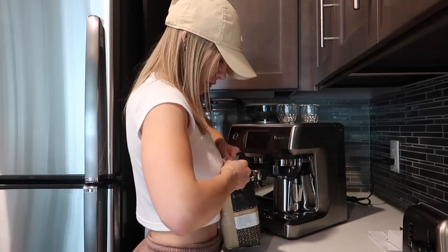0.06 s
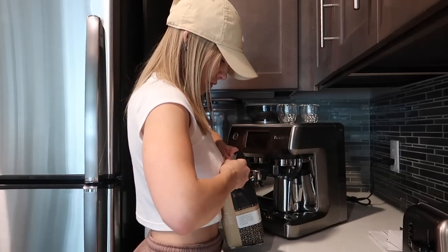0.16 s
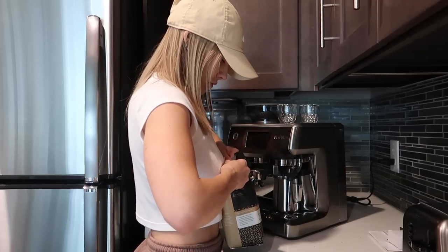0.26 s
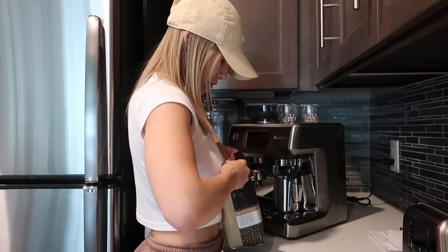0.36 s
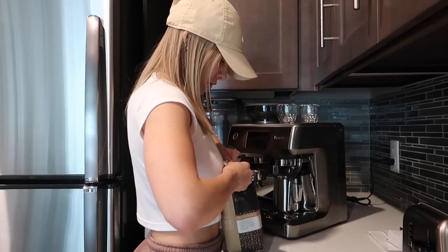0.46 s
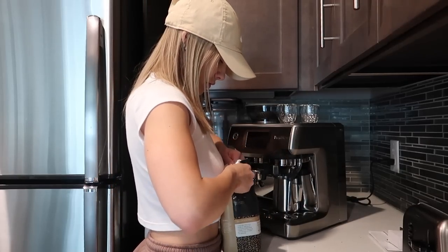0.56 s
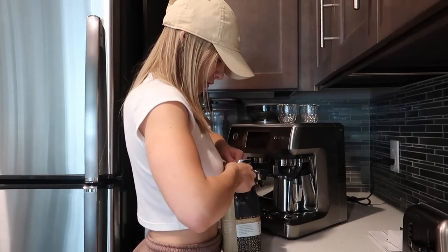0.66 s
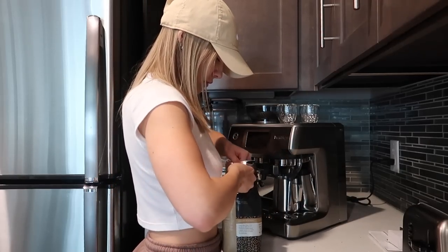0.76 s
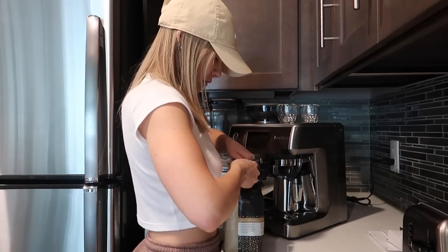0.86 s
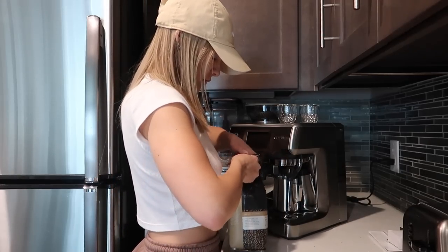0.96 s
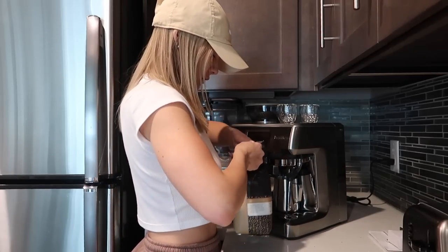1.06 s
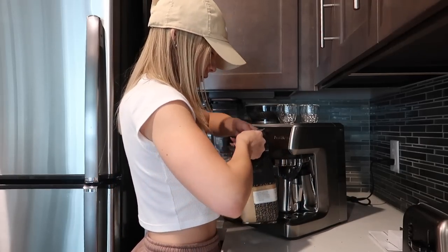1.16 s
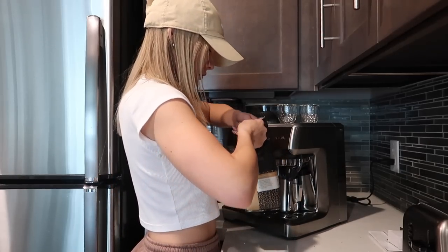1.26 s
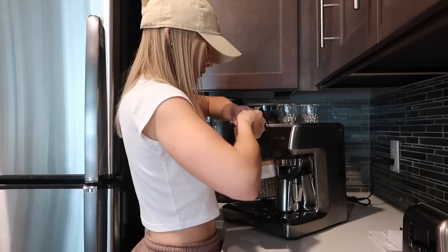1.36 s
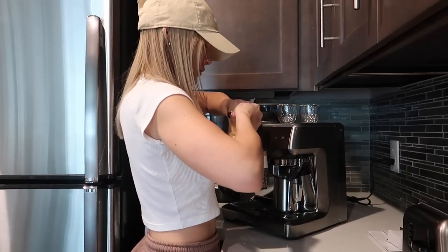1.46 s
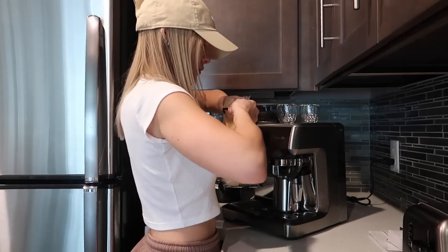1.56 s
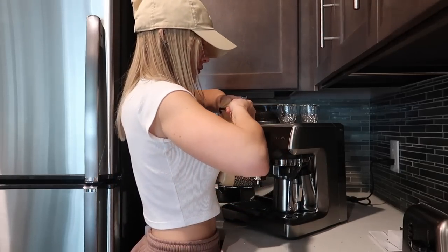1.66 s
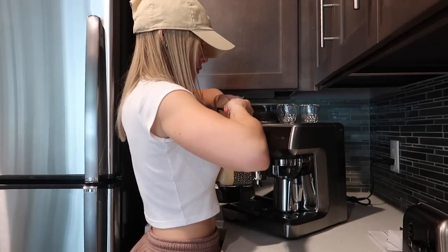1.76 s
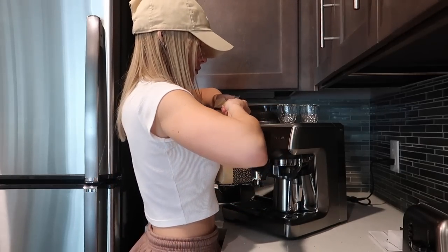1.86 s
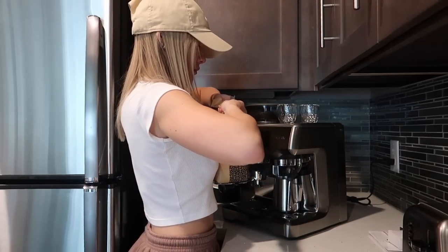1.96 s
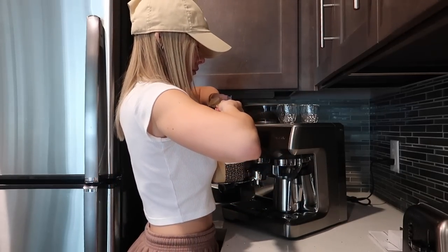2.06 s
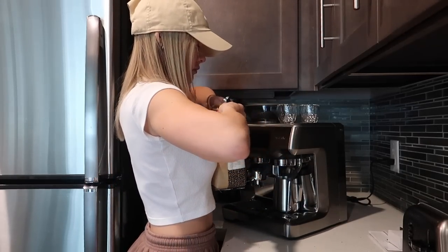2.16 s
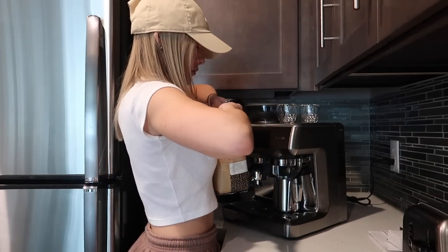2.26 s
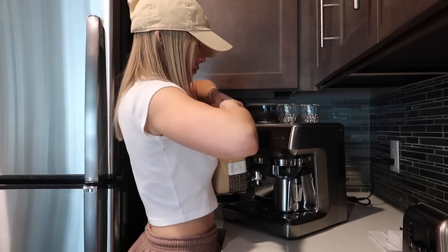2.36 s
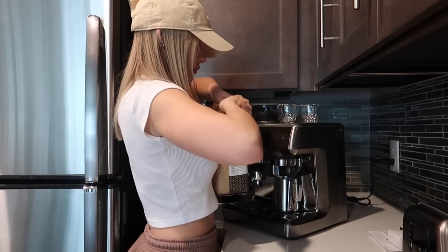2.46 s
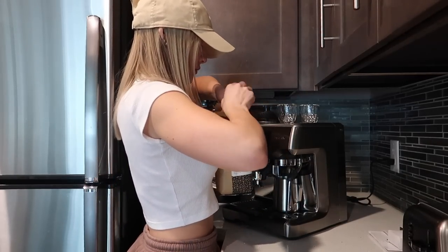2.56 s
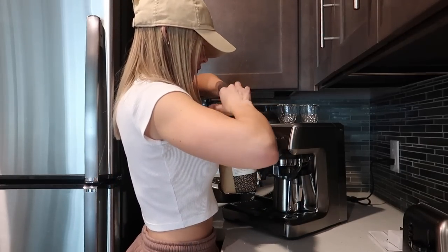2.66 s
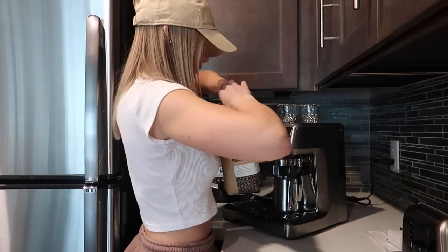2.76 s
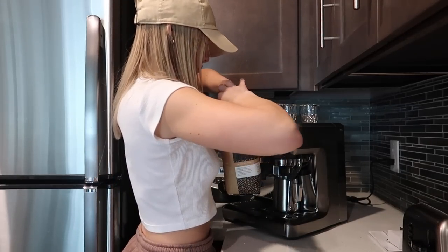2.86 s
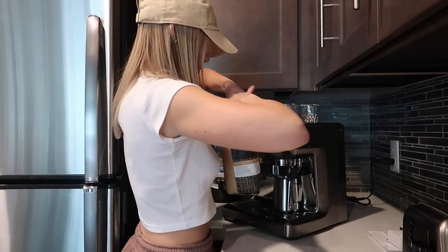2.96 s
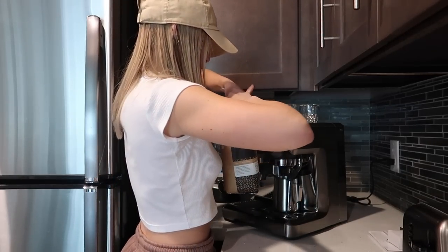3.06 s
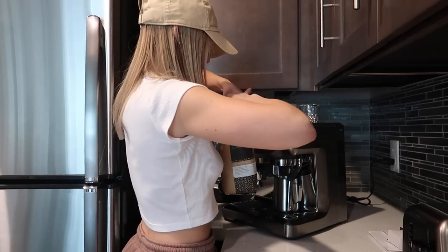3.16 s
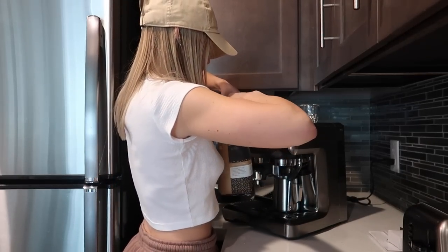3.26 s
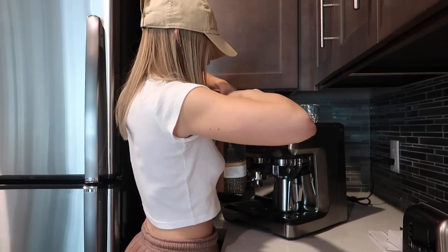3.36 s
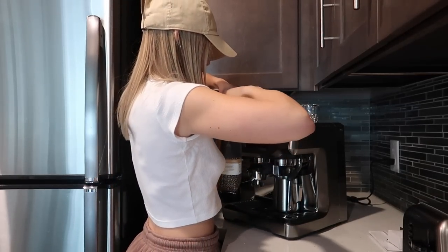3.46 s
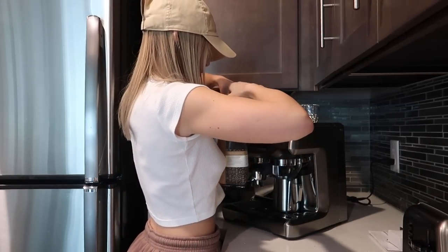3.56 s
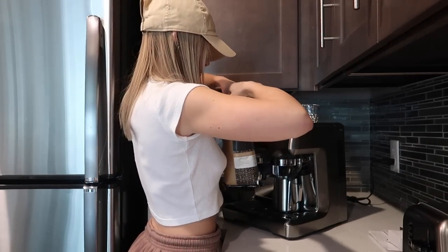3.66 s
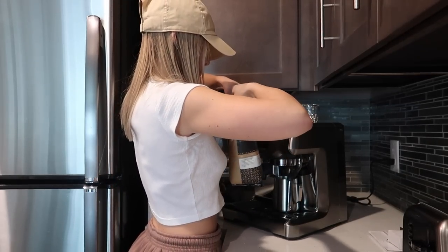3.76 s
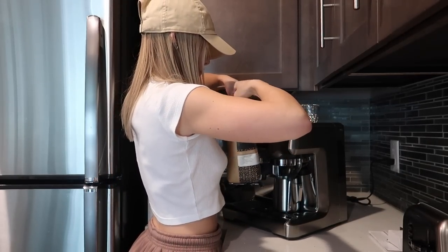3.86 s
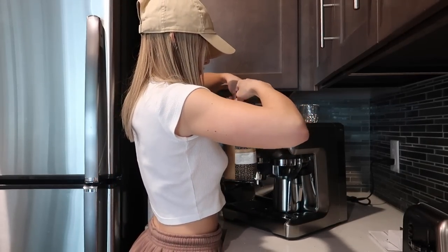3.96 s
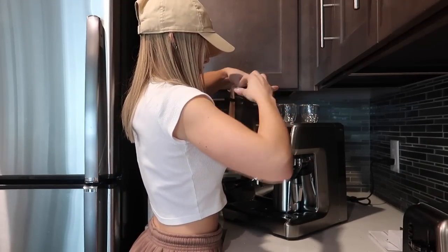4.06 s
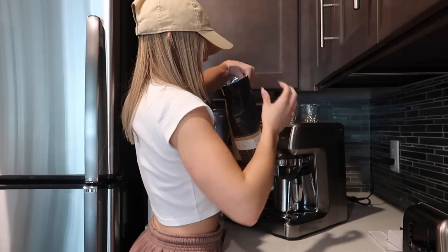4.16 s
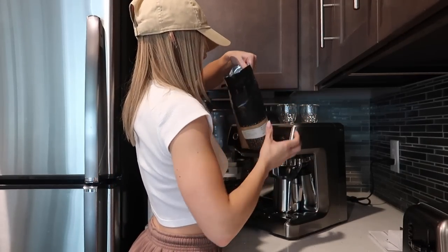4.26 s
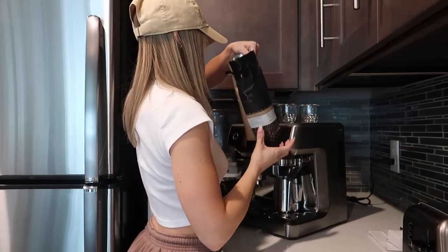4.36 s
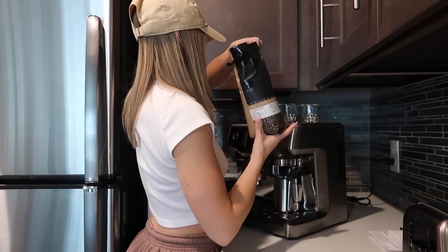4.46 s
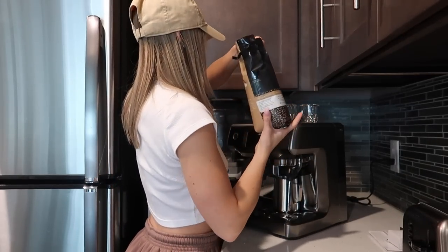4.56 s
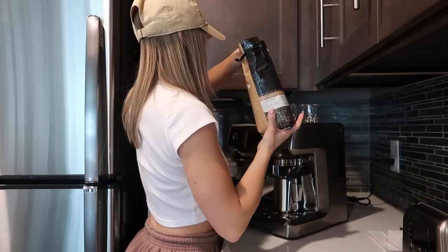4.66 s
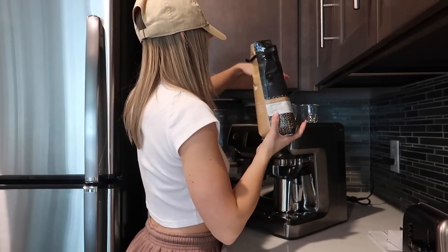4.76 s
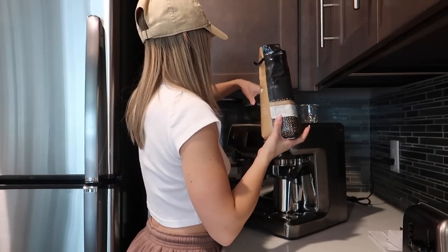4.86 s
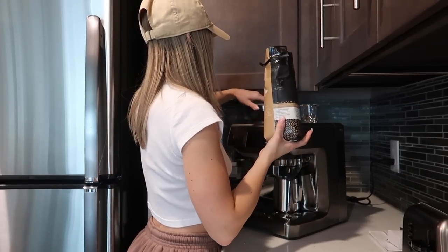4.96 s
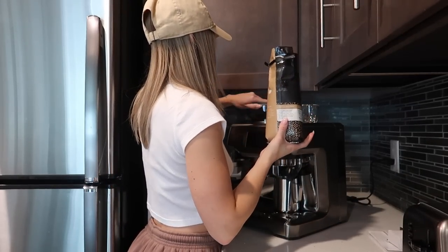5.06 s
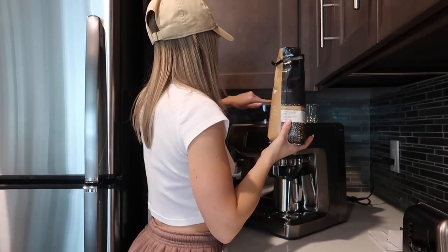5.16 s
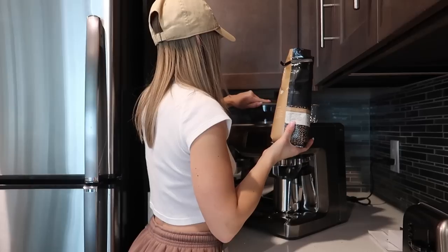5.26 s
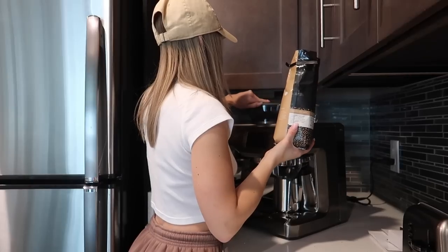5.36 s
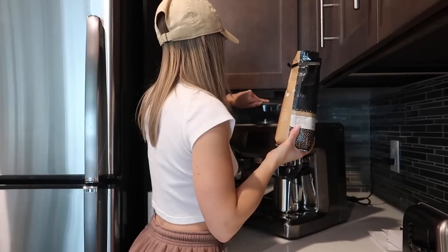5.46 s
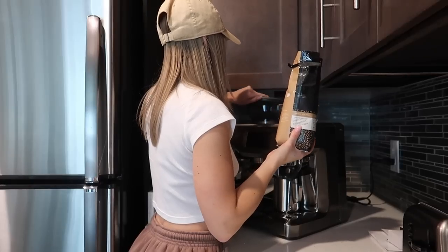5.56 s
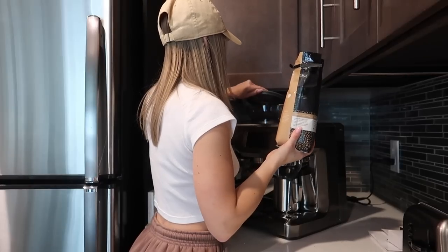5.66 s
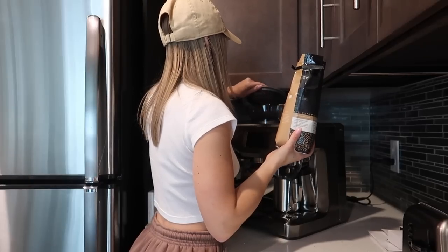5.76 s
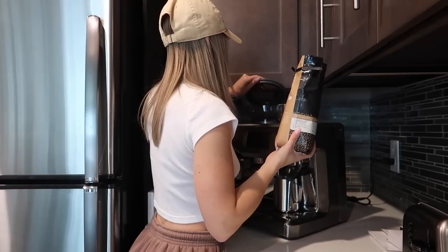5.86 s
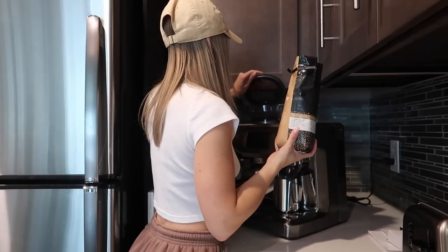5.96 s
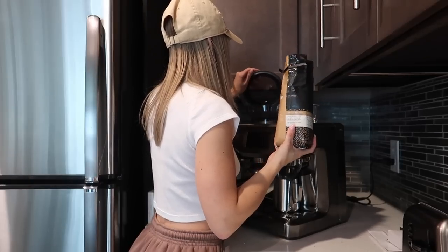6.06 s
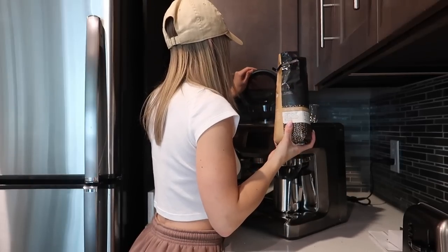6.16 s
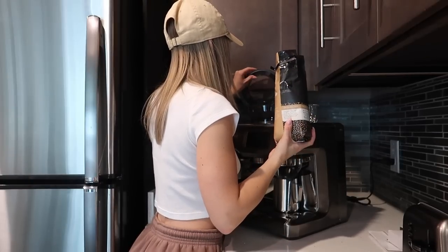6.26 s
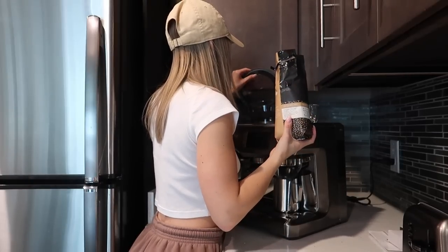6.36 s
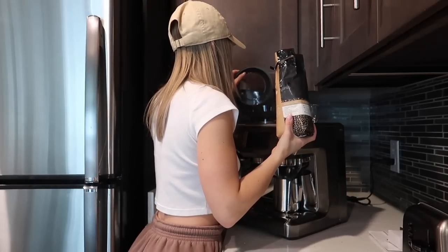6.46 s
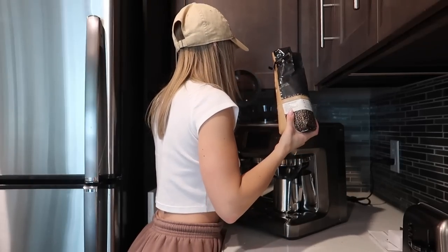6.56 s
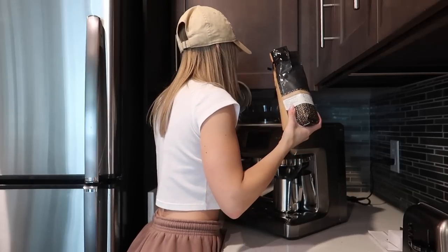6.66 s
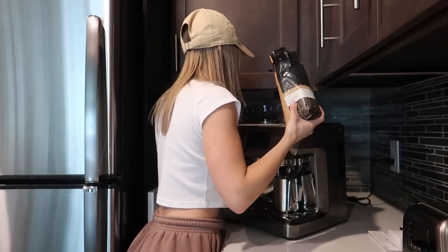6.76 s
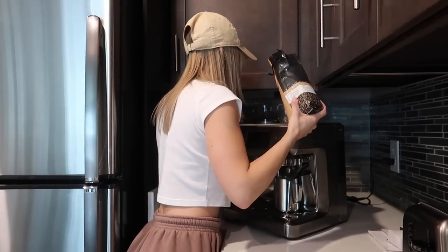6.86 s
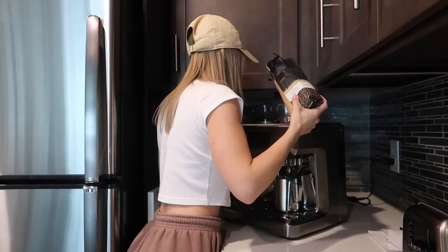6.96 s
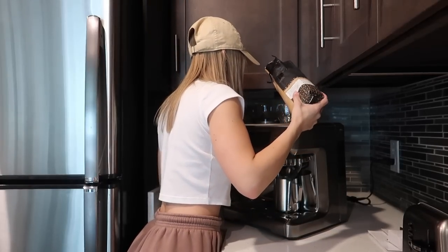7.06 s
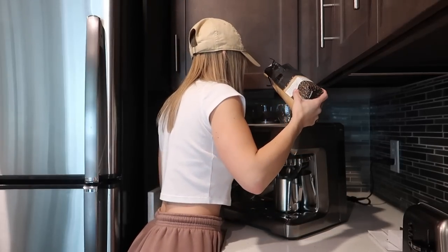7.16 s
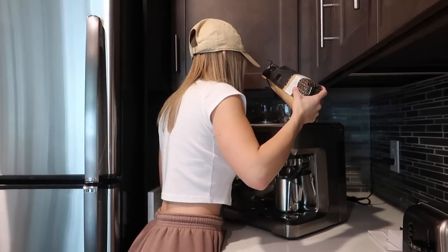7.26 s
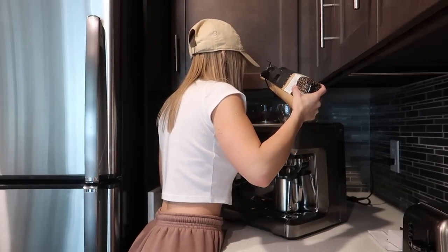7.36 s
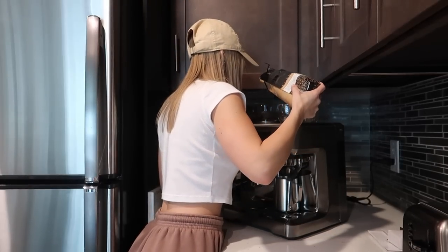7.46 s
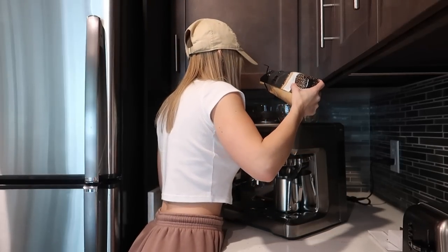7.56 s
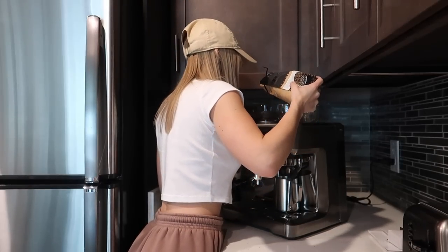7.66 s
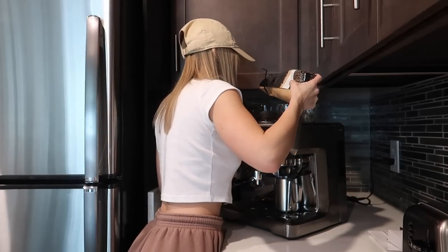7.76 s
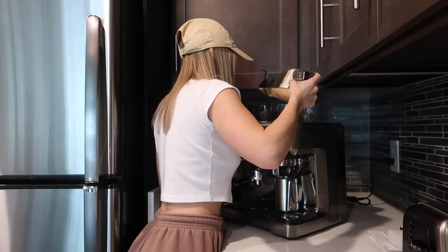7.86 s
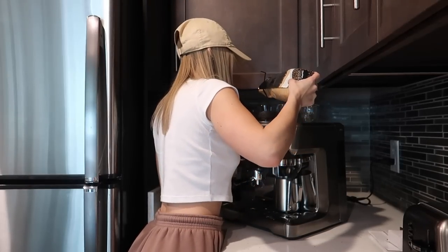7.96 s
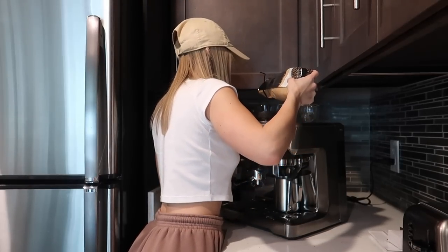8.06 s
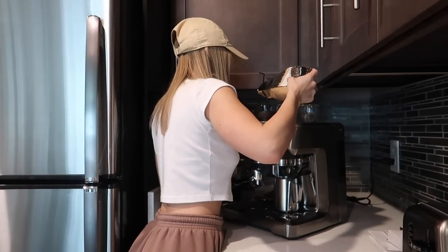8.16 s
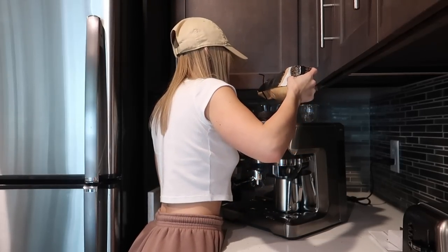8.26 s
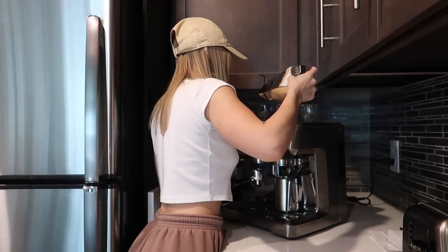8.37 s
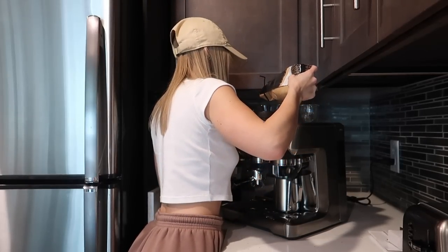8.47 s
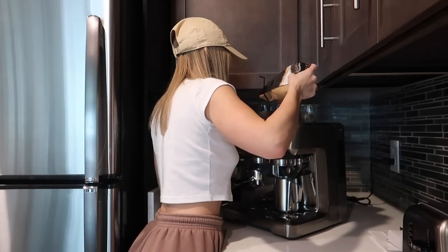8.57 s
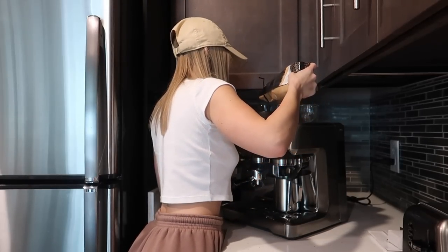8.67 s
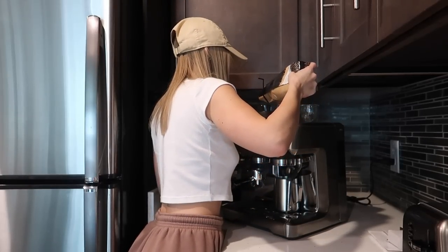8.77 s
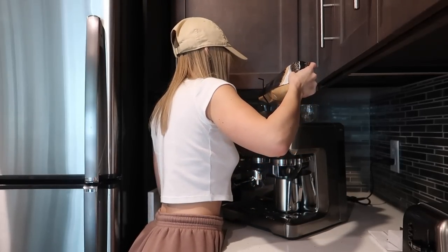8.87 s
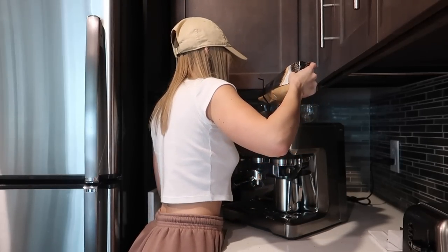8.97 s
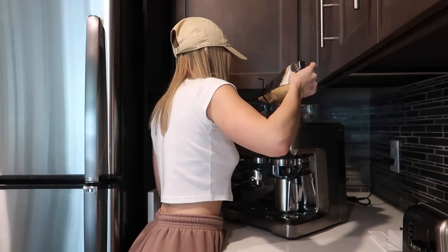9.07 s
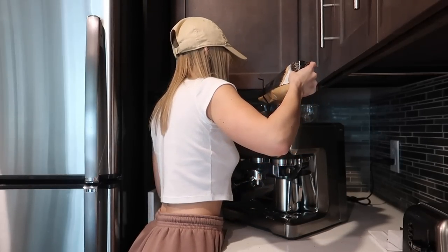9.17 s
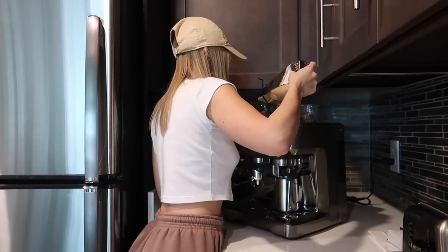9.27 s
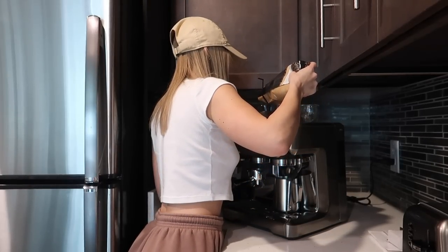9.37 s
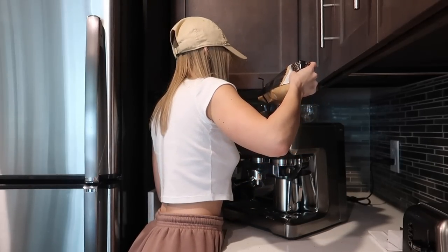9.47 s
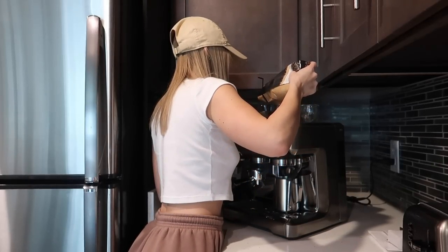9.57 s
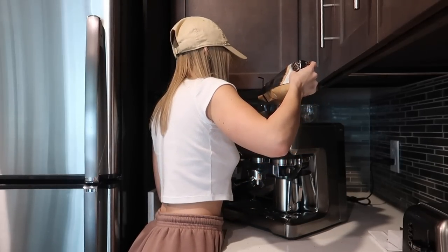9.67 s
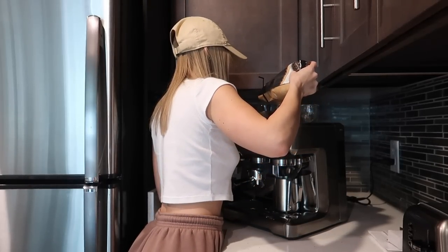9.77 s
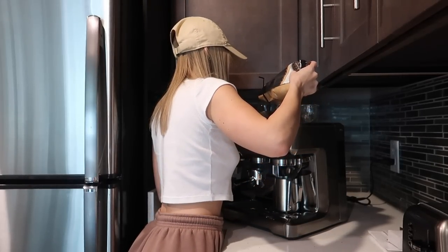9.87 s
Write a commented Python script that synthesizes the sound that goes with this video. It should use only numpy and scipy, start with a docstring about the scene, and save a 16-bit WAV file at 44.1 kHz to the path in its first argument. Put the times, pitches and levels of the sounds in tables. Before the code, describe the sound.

Close crackling and popping of a foil bag in a humming kitchen, a quiet pause, shifting beans, and finally a rattling pour into plastic.

```python
"""All along, a refrigerator hums (wavering tones over fan noise), heard at two close microphone ports.
First a stiff foil coffee bag is unrolled and opened in a kitchen: its walls snap (short bursts that ring a
panel) and rustle (clumps of tiny clicks), with soft low bumps (fading sines) and a few hollow rings.
From about 7 s the beans slide inside as the bag tips: taps drum on its resonances. Near 9 s first single
beans, then a stream, fall into a plastic hopper: random hits ring its resonances and clatter."""
import sys
import numpy as np
from scipy import signal
from scipy.fft import rfft, irfft, next_fast_len
from scipy.io import wavfile
from scipy.ndimage import uniform_filter1d, map_coordinates

SR = 44100
rng = np.random.default_rng(int(sys.argv[2]) if len(sys.argv) > 2 else 0)


def master_out(mix):
    """Clip the mix to full scale and print it as 16-bit PCM to the path in sys.argv[1]."""
    frames = np.transpose(np.atleast_2d(mix))
    ceiling = np.clip(frames, -1, 1)
    pcm = np.round(ceiling * 32767).astype(np.int16)
    wavfile.write(sys.argv[1], SR, pcm)


N = 437031  # length in samples

# Refrigerator loudness. Each row: time in seconds, level in dB.
HUM_LEVEL = [(0.0, -46.5), (0.44, -42.5), (0.75, -40.5), (9.58, -42), (9.91, -44.5)]
# Tones of the refrigerator motor. Each row: multiple of the shaft speed, relative level in dB.
HUM_TONES = [(1, -7), (4.15, -8), (5.53, -0.5), (6, -8.5), (7.95, -8.5), (9, -3.5), (10.42, -5),
             (11.04, 2.5), (12, -2.5), (13, -3.5), (14, -9.5)]
# A thin, high tone. Each row: frequency in Hz, level in dB.
WHINE = [(2837, -67)]
# Color of the fan and room air. Each row: frequency in Hz, relative level in dB per Hz.
AIR_COLOR = [(12, -27), (20, -6), (81, -13.5), (157, -9), (191, -8.5), (253, -2.5), (599, -15), (963, -20),
             (1310, -25.5), (1500, -25.5), (1930, -29.5), (2940, -28.5), (3670, -31.5), (11800, -45.5),
             (15600, -58)]
# How fast the kitchen echo dies. Each row: frequency in Hz, time to fall 60 dB in seconds.
ECHO_TIME = [(300, 0.13), (2000, 0.61), (5000, 0.42), (12000, 0.14)]
# Share of room sound. Each row: frequency in Hz, level in dB.
ECHO_LEVEL = [(300, -4.5), (1500, -10), (5000, -7), (12000, -8)]
# Left-right likeness of roomy sound. Each row: frequency in Hz, likeness (1 same, 0 unrelated, below 0 opposed).
LIKENESS = [(25, .997), (60, .95), (400, .96), (1300, .98), (2500, .9), (4500, .4), (8000, 0), (15000, -.2)]
# How far the right port leads the left. Each row: frequency in Hz, phase in radians.
PORT_LEAD = [(100, 0), (1500, .06), (3000, .25), (5500, 1), (8000, 1.6), (12000, 2.2), (16000, 2.4)]
# Part of the sound scattered by things close by. Each row: frequency in Hz, share from 0 to 1.
SCATTER = [(500, .04), (1500, .06), (3000, .22), (6000, .72), (12000, .85)]
# The full bag or a hand bumps the counter. Each row: start in seconds, bump level in dB,
# bump frequency in Hz, level in dB of the jolt of the beans inside.
THUDS = [(1.155, -33, 233, -19), (1.341, -35, 250, -21.5), (2.138, -38, 148, -17.5), (2.192, -38, 243, -13),
         (2.277, -44, 242, -19), (2.625, -31.5, 177, -21.5), (2.829, -36, 184, -15.5),
         (2.949, -31, 196, -16.5), (3.1, -36, 170, -28), (3.602, -34, 232, -22), (4.106, -38, 186, -25),
         (5.611, -37.5, 106, -53)]
# A knock leaves something hollow ringing. Each row: start in seconds, starting level in dB, frequency in Hz.
RINGS = [(1.16, -29, 1586), (3.908, -30, 848), (4.848, -38, 1367)]
# Slips of the bean heap. Each row: time at full strength in seconds, level in dB, hold in seconds.
SLIPS = [(7.17, -33.5, 0.18), (7.54, -47, 0.079), (7.66, -45.5, 0.17), (8.05, -31, 0.26),
         (8.51, -40.5, 0.06), (8.7, -45, 0.45), (9.04, -38, 0.13), (9.16, -30, 0.054), (9.3, -32.5, 0.53)]
# Small avalanches within a slip. Each row: time at full strength in seconds, level in dB.
SURGES = [(7.131, -29), (7.195, -26), (7.232, -26), (7.276, -28), (7.35, -33), (8.063, -25.5),
          (8.18, -27.5), (8.222, -30.5)]
# Color of loose beans tumbling. Each row: frequency in Hz, relative level in dB per Hz.
BEAN_COLOR = [(210, -15), (350, -6), (466, -9.5), (591, -4), (692, -5), (1050, -0.5), (2500, -3),
              (15500, -37.5)]
# Resonances of the air and walls of the upright bag. Each row: frequency in Hz, width in Hz, relative level in dB.
UPRIGHT_BAG = [(817, 38, 17.5), (950, 53, 25), (1423, 53, 18), (2310, 78, 23), (2960, 850, 6)]
# The same once the bag lies tipped. Each row: frequency in Hz, width in Hz, relative level in dB.
TIPPED_BAG = [(584, 32, 14.5), (898, 40, 11), (1038, 37, 21), (1446, 47, 10), (1733, 42, 19),
              (2580, 59, 13)]
# Single beans ahead of the stream. Each row: time in seconds, level in dB.
FIRST_BEANS = [(8.93, -22), (9, -24.5), (9.025, -26), (9.216, -16.5), (9.276, -16.5)]
# The stream of beans landing in the hopper. Each row: time in seconds, level in dB.
POUR_LEVEL = [(8.99, -65), (9.03, -37), (9.2, -48), (9.26, -36), (9.28, -26), (9.38, -20.5), (9.47, -20.5),
              (9.58, -20), (9.91, -24)]
# Resonances of the plastic hopper. Each row: frequency in Hz, width in Hz, relative level in dB.
HOPPER = [(2090, 66, -3), (2814, 32, 4.5), (2940, 35, 4), (2990, 62, 5), (3500, 48, 1), (3720, 100, -1),
          (4424, 38, 4), (4490, 30, 4), (6100, 50, 0), (6720, 98, -6), (7810, 140, 6.5)]
# Color of bean hitting bean. Each row: frequency in Hz, relative level in dB per Hz.
CLATTER_COLOR = [(290, -34), (500, -21), (2440, -15), (2900, -4), (3300, -9.5), (4460, -11), (4800, -10),
                 (7830, -11), (11900, -16), (13300, -20), (15600, -85)]
# Squeezes of the foil. Each row: time at full strength in seconds, level in dB, hold in seconds.
SQUEEZES = [(0.02, -43.5, 0.015), (0.56, -42.5, 0.26), (0.8, -39, 0.082), (1.22, -46, 0.35),
            (2.165, -26, 0.084), (2.4, -45.5, 0.22), (2.68, -38, 0.19), (3.03, -37, 0.073),
            (3.2, -45.5, 0.12), (3.44, -26.5, 0.056), (3.595, -29, 0.038), (3.8, -36.5, 0.018),
            (4.08, -38, 0.074), (4.58, -40.5, 0.1), (4.69, -52, 0.012), (5.3, -58.5, 0.31),
            (5.92, -46.5, 0.0074)]
# Color of the crackling foil. Each row: frequency in Hz, relative level in dB per Hz.
FOIL_COLOR = [(180, -21), (300, -8), (652, -5.5), (835, 4), (1070, -5), (2610, -3.5), (7500, -21.5),
              (15500, -55)]
# Snaps of the bag wall and small knocks. Each row: start in seconds, level in dB, panel frequency in Hz,
# treble in dB, suddenness in dB.
SNAPS = [(0.112, -22, 2460, -58, 1), (0.215, -24.5, 2130, -60, -4), (0.449, -34.5, 960, -34, 1),
         (0.508, -27, 1840, -48, -4), (0.533, -23, 1640, -46, 6), (0.573, -29, 2000, -39, 2),
         (0.599, -25, 890, -50, 2), (0.657, -31, 1260, -10, -4), (0.8, -33.5, 2490, -15, 8),
         (0.83, -25, 2460, -0.5, -1), (0.842, -16.5, 2850, -21, 7), (0.906, -24.5, 2260, 4.5, 19),
         (0.995, -29, 2480, -39, 1), (1.081, -26.5, 2730, -16, 12), (1.088, -24.5, 1010, -54, 0),
         (1.158, -20, 1470, -20, -4.5), (1.325, -18, 2840, -34, 5), (1.341, -16, 2970, -42, -1),
         (1.438, -19, 2740, -2, 2), (1.462, -21, 2480, -20, -7), (1.492, -15.5, 2240, -52, 13),
         (1.564, -21.5, 2350, -47, 12), (1.926, -33.5, 587, -24, 13), (1.987, -16, 2010, -14.5, 1),
         (2.001, -15, 2570, -11, 9), (2.142, -8, 2700, -31, 8), (2.153, -16.5, 2130, -11, 0),
         (2.183, -13.5, 1510, -6.5, 2), (2.2, -12.5, 1090, -10.5, -5), (2.233, -13.5, 2520, -41, -6),
         (2.276, -15, 1500, -47, -3), (2.445, -37, 970, -32, 1), (2.508, -31, 800, -16, 9),
         (2.609, -23.5, 2140, -56, 12), (2.624, -21, 2000, -45, -12), (2.743, -26.5, 2600, -38, 18),
         (2.774, -32, 2490, -26, -1), (2.832, -16, 2050, -55, 2), (2.946, -16, 2440, -48, -1),
         (3.021, -23, 1950, -32, -7), (3.051, -30, 2530, -30, 2), (3.065, -20, 1290, -48, 3),
         (3.096, -23, 1980, -8, -9), (3.112, -25, 2180, 0, 5), (3.167, -26.5, 970, -27, -3),
         (3.256, -12, 2780, -6, 15), (3.292, -15.5, 1720, -27, 0), (3.357, -22.5, 890, -49, -6),
         (3.404, -20.5, 2600, -23, 2), (3.422, -11.5, 2640, -8.5, 3), (3.464, -14.5, 855, -10, -2),
         (3.5, -15, 1200, -10.5, 2), (3.574, -26, 2740, -30, 9), (3.59, -19, 1500, -25, 3),
         (3.608, -20, 1510, -35, 16), (3.654, -34.5, 2470, 2, 5), (3.736, -18.5, 2190, -13, -6),
         (3.779, -27, 1600, -30, 2), (3.816, -31, 2280, -38, 1), (3.907, -23, 850, -25, 4),
         (3.998, -23.5, 2300, -19, 12), (4.019, -23, 1400, -35, 10), (4.033, -21, 960, -42, 1),
         (4.068, -25, 2840, -7, 1), (4.114, -18.5, 1820, -20, 2), (4.346, -33.5, 2320, 0.5, -4),
         (4.518, -38.5, 2340, -0.5, -17), (4.546, -19, 2700, -4.5, 13), (4.694, -38, 2500, -3, -11),
         (4.842, -33, 1160, -24, 5), (5.034, -43, 2980, 2, 15), (5.61, -45, 2960, -3, 3),
         (5.94, -34, 1000, -8.5, 2), (6.687, -43, 3060, -8, 0), (6.719, -32.5, 3460, -25, 24),
         (7.068, -22, 3600, -6, 9), (7.111, -32, 1420, -34, 7), (7.537, -34, 1460, -27, -9),
         (7.563, -29.5, 1470, -45, -8), (7.641, -24, 2280, -40, -2), (7.863, -30.5, 2460, -16, 9),
         (7.917, -28, 870, -46, -1), (7.95, -28, 890, -44, -6), (7.977, -29.5, 2700, -13, 9),
         (8.32, -20.5, 3080, -33, 7), (8.553, -33.5, 1030, -40, 2), (8.634, -32.5, 1890, -40, 9),
         (8.696, -35.5, 2420, -17, 17), (8.788, -33, 1020, -7.5, -6), (8.832, -29.5, 2470, -41, -1)]

SHAFT_HZ = 28.59  # refrigerator motor speed
TOP_HZ = 15750  # nothing is kept above this
JOLT_HZ, JOLT_WIDTH_HZ, JOLT_T60_S = 563, 810, 0.087  # dull crunch of packed beans
RING_T60_S = 0.25
SLIP_RISE, SLIP_FALL = 107, 77  # dB per second
SURGE_RISE, SURGE_FALL = 280, 240  # dB per second
SQUEEZE_RISE, SQUEEZE_FALL = 380, 130  # dB per second
# The bag tips; its lowest resonance drops out as the heap settles, and returns higher as beans leave.
TIP_S, SETTLE_S, SPILL_S, SPILL_HZ = 7.8, 8.3, 8.6, 801
BEAN_HZ, BEAN_TREBLE_DB, BEAN_SUDDEN_DB = 3260, 2, 3  # crack of a lone bean
BEAN_RING_DB = 25.5  # how hard a lone bean sets the empty hopper ringing
THUMP_DB, THUMP_DB_PER_OCTAVE = -11, -5.5  # body of the full bag under a 1 kHz panel; less under higher ones
SNAP_TOP_HZ = 7900  # cracks are dull above this
ROLLOFF_HZ = 10900  # gentle lowpass over the finished burst
HOLLOW_HZ = 2000  # panels below this ring more clearly
SNAP_T60_S, SNAP_RISE_S = 0.093, 0.00068  # the rise is slower the less sudden the snap


def amp(db):
    """Gain of a level in dB."""
    return 10 ** (np.asarray(db) / 20)


def unit(x):
    """Scale x to an average strength (rms) of 1."""
    return x / np.sqrt(np.mean(x ** 2) + 1e-20)


def along(points, hz):
    """Read a table of (Hz, value) points at any frequency, on a log axis."""
    f, value = np.transpose(points)
    return np.interp(np.log(hz + 1), np.log(f + 1), value)


def level_curve(points):
    """Join (seconds, dB) points into one level per sample; silent outside the table."""
    s, level_db = np.transpose(points)
    return np.interp(np.arange(N) / SR, s, level_db, left=-120, right=-120)


def wobble(rate):
    """A smooth random curve with rate knots a second."""
    knots = rng.standard_normal(int(N * rate / SR) + 4)
    return map_coordinates(knots, [np.arange(N) * rate / SR])


def swells(rows, rise, fall):
    """Gain of overlapping movements: each rises, holds and falls away."""
    t = np.arange(N) / SR
    power = 0
    for s, db, hold in rows:
        before, after = np.maximum(s - t, 0), np.maximum(t - s - hold, 0)
        power = power + amp(db - rise * before - fall * after) ** 2
    return np.sqrt(power)


def clicks(rate, spread_db):
    """Random clicks of scattered strength, rate of them a second."""
    count = round(rate * N / SR)
    at = rng.integers(N, size=count)
    size = rng.standard_normal((2, count))
    strength = np.sign(size[0]) * amp(spread_db * np.clip(size[1], -2, 2))
    return unit(np.bincount(at, strength, N))


def filtered(x, response):
    """Shape the spectrum of x by a response, which is a function of frequency."""
    m = next_fast_len(x.shape[-1] + 8192)
    return irfft(rfft(x, m) * response(np.fft.rfftfreq(m, 1 / SR)), m)[..., :x.shape[-1]]


def band(f, hz, width):
    """One resonance, which rings on after being struck."""
    return 1j * f * width / (hz * hz - f * f + 1j * f * width)


def modes(table):
    """Response of a body with several resonances, added with alternating signs."""
    return lambda f: sum((-1) ** k * amp(db) * band(f, hz, w) for k, (hz, w, db) in enumerate(table))


def spread(pair):
    """Two unrelated signals as sound from all around, as alike at both ports as LIKENESS says."""
    def mix(f):
        turn = np.arccos(np.clip(along(LIKENESS, f), -1, 1)) / 2
        return np.array([np.cos(turn), np.sin(turn)])
    mid, side = filtered(pair, mix)
    return np.array([mid + side, mid - side])


def in_turns(x, tails, rate):
    """The source moves about: stereo echo tails fade into one another, rate changes a second."""
    turn, count = np.arange(N) / SR * rate, len(tails)
    out = 0
    for k, tail in enumerate(tails):
        distance = np.abs((turn - k + count / 2) % count - count / 2)
        share = np.cos(np.pi / 2 * np.minimum(distance, 1))
        tail = tail / np.linalg.norm(tail, axis=1, keepdims=True)
        out = out + signal.oaconvolve((x * share)[None], tail, axes=1)[:, :N]
    return out


def fridge():
    """A motor hums at unsteady multiples of its speed, over fan noise and a thin whine."""
    t = np.arange(N) / SR
    hum = 0
    for k, db in HUM_TONES:
        level = amp(db + 1.3 * wobble(4))
        apart = .14 * wobble(4) * np.array([[1], [-1]])  # the two ports drift in opposite directions
        phase = 0.25 * wobble(4) + min(k / 3, 1) * apart
        hum = hum + level * np.sin(2 * np.pi * k * SHAFT_HZ * t + phase)
    whine = 0
    for hz, db in WHINE:
        whine = whine + amp(db + 5.0 * wobble(21)) * np.sin(2 * np.pi * hz * t + 2.2 * wobble(16))
    noise = rng.standard_normal((2, N))
    air = unit(spread(filtered(noise, lambda f: amp(along(AIR_COLOR, f)))))
    return amp(level_curve(HUM_LEVEL)) * (0.73 * unit(hum) + 0.64 * air) + whine


def kitchen(x, count=3):
    """Tiles and cupboards answer with fading noise tails; each frequency dies at its own speed."""
    hz, t, z = signal.stft(rng.standard_normal((count, 2, SR // 2)), SR, nperseg=256)
    z = z * amp(-60 * t / along(ECHO_TIME, hz)[:, None])
    z = z / np.linalg.norm(z, axis=-1, keepdims=True)
    tails = signal.istft(z, SR, nperseg=256)[1]
    late = np.pad(x, (60, 0))[:N]  # the echo starts 60 samples late
    echo = in_turns(late, tails, rate=3.1)
    return spread(filtered(echo, lambda f: amp(along(ECHO_LEVEL, f))))


def ports(x, count=6):
    """Sound from the right reaches the left port later and weaker; scattered treble differs between them."""
    def straight(f):
        lead = np.exp(np.array([[-.5j], [.5j]]) * along(PORT_LEAD, f))
        return np.sqrt(1 - along(SCATTER, f) ** 2) * lead
    t = np.arange(SR // 50) / SR
    bounces = rng.standard_normal((count, 2, len(t))) * amp(-60 * t / 0.018)
    bounced = in_turns(x, bounces, rate=37)
    scattered = filtered(bounced, lambda f: along(SCATTER, f))
    return amp([[-.45], [.45]]) * (filtered(x, straight) + scattered)


def thuds():
    """Soft low bumps that die in a few cycles; the packed beans crunch dully with each."""
    out, t = np.zeros(N + SR), np.arange(SR // 4) / SR
    for s, db, hz, jolt_db in THUDS:
        bump = amp(db + 6.0 - 60 * t / 0.11) * (1 - np.exp(-t / 0.0014)) * np.sin(2 * np.pi * hz * t)
        noise = rng.standard_normal(len(t))
        crunch = unit(filtered(noise, lambda f: band(f, JOLT_HZ, JOLT_WIDTH_HZ) ** 2))
        jolt = amp(jolt_db - 60 * t / JOLT_T60_S) * (1 - np.exp(-t / 0.0039)) * crunch
        out[round(s * SR):][:len(t)] += bump + jolt
    return out[:N]


def rings():
    """A single slightly unsteady tone fades after the knock."""
    out, t = np.zeros(N + SR), np.arange(SR // 2) / SR
    for s, db, hz in RINGS:
        tone = np.sin(2 * np.pi * hz * t + 2.3 * wobble(47)[:len(t)])
        out[round(s * SR):][:len(t)] += amp(db - 60 * t / RING_T60_S) * tone
    return out[:N]


def slide():
    """Beans tumble over each other and drum on the hollow bag, whose resonances change as it tips."""
    taps = clicks(2500, spread_db=3) * amp(1.8 * wobble(70))
    settled = TIPPED_BAG[1:]
    spilling = [(SPILL_HZ, *TIPPED_BAG[0][1:])] + settled
    bodies = (UPRIGHT_BAG, TIPPED_BAG, settled, spilling)
    stage = np.searchsorted([TIP_S, SETTLE_S, SPILL_S], np.arange(N) / SR)
    drum = np.choose(stage, [unit(filtered(taps, modes(body))) for body in bodies])
    loose = unit(filtered(taps, lambda f: amp(along(BEAN_COLOR, f))))
    slips = swells(SLIPS, SLIP_RISE, SLIP_FALL)
    surges = swells([(s, db, 0) for s, db in SURGES], SURGE_RISE, SURGE_FALL)
    return np.hypot(slips, surges) * (0.61 * drum + 0.77 * loose)


def pour():
    """A stream of beans: each lands on its own spot, so each hopper mode flares at its own moments."""
    ring = 0
    for hz, width, db in HOPPER:
        hits = clicks(900, spread_db=0.5)
        ring = ring + amp(db) * unit(filtered(hits, lambda f: band(f, hz, width)))
    clatter = unit(filtered(clicks(2600, spread_db=2.5), lambda f: amp(along(CLATTER_COLOR, f))))
    flow = amp(level_curve(POUR_LEVEL) + 1.3 * wobble(22) + wobble(100))
    s, db = np.transpose(FIRST_BEANS)
    lone_hits = np.bincount(np.round(s * SR).astype(int), amp(db + BEAN_RING_DB), N)
    lone = filtered(lone_hits, modes(HOPPER))
    return flow * (0.94 * unit(ring) + 1.03 * clatter) + lone


def rustle():
    """Bending foil gives off clumps of tiny crackles."""
    grains = clicks(2000, spread_db=3.5) * amp(3.5 * np.clip(wobble(60), -2, 1.6))
    crackle = unit(filtered(grains, lambda f: amp(along(FOIL_COLOR, f))))
    return swells(SQUEEZES, SQUEEZE_RISE, SQUEEZE_FALL) * crackle


def snaps():
    """A crease buckles: a crack, then clumped slips ring the panel and shake the bag; lone beans crack alike."""
    drops = [(s, db, BEAN_HZ, BEAN_TREBLE_DB, BEAN_SUDDEN_DB) for s, db in FIRST_BEANS]
    s, db, hz, treble_db, sudden_db = np.transpose(SNAPS + drops)[:, :, None]  # one row per snap
    t = np.arange(SR // 8) / SR
    noise = rng.standard_normal((len(s), 2, len(t)))
    clumps = amp(2.07 * unit(uniform_filter1d(noise[:, 1], size=70)))
    rise = 1 - np.exp(-t * amp(2 * sudden_db) / SNAP_RISE_S)
    slips = noise[:, 0] * clumps * amp(-60 * t / SNAP_T60_S) * rise
    crack = 1.56 * amp(sudden_db - 60 * t / 0.00058) * np.sign(noise[:, 0, :1])
    thump_db = THUMP_DB + THUMP_DB_PER_OCTAVE * np.log2(hz / 1000)

    def body(f):
        hollow = HOLLOW_HZ / hz
        clear = hollow * band(f, hz, 0.037 * hz) * band(f, hz, 1.0 * hz)
        broad = 2.0 * band(f, hz, 1.065 * hz) ** 2
        boxy = 0.11 * hollow ** 2 * band(f, 1460, 1140) ** 2
        thump = amp(thump_db) * 3 * band(f, 619, 127) ** 2
        dulled = (clear + broad + boxy + thump) / (1 + 1j * f / SNAP_TOP_HZ) ** 2
        tick = amp(treble_db) * 1.01 * band(f, 4700, 4400) ** 2
        return dulled + tick

    burst = filtered(slips + crack, body)
    burst = filtered(burst, lambda f: 1 / (1 + 1j * f / ROLLOFF_HZ - (f / ROLLOFF_HZ) ** 2))
    # set each level by the first 10 ms, whose average strength lies well under the peak
    burst *= 0.66 / np.sqrt(np.mean(burst[:, :SR // 100] ** 2, axis=1, keepdims=True))
    at = (np.round(s * SR).astype(int) + np.arange(len(t))).ravel()
    return np.bincount(at, (amp(db) * burst).ravel(), N + SR)[:N]


def scene():
    """Bag, beans and hopper close by, in the kitchen's echo and the refrigerator's hum."""
    near = thuds() + rings() + slide() + pour() + rustle() + snaps()
    return fridge() + kitchen(near) + ports(near)


def record(dry):
    """Turn everything down slightly, round off the very loudest peaks and keep nothing above TOP_HZ."""
    rounded = dry / (2 + 2 * dry ** 10) ** (1 / 10)
    return filtered(rounded, lambda hz: hz < TOP_HZ)


dry = scene()
out = record(dry)
master_out(out)
```